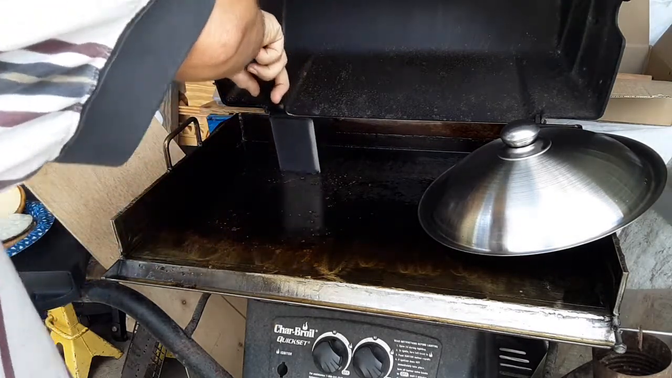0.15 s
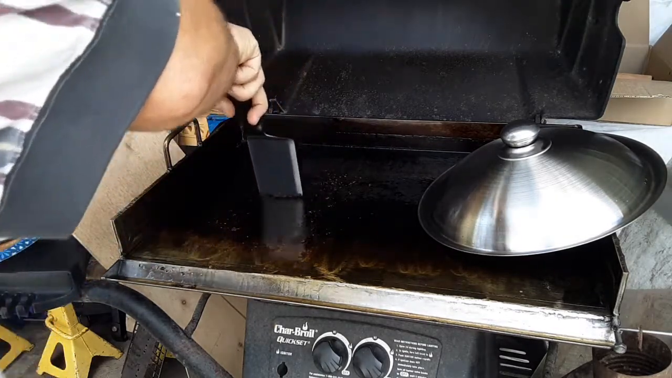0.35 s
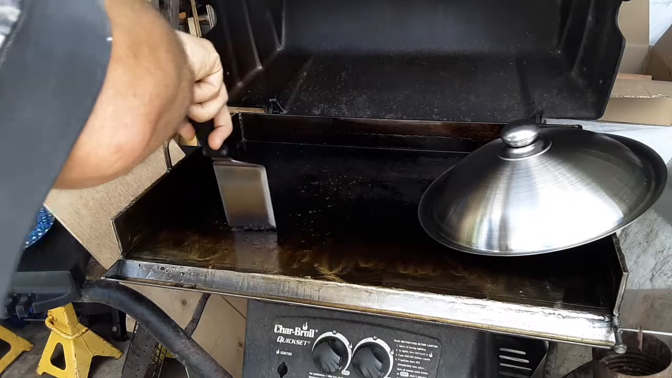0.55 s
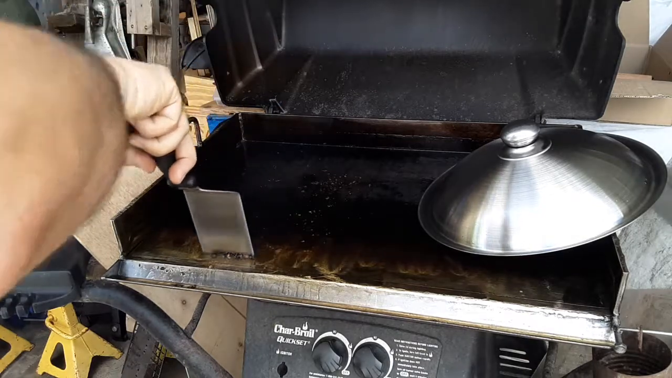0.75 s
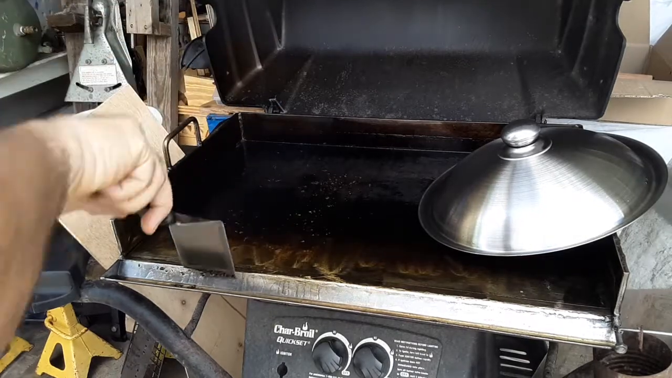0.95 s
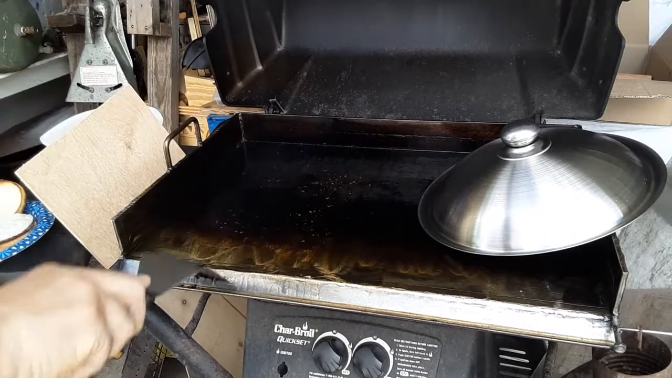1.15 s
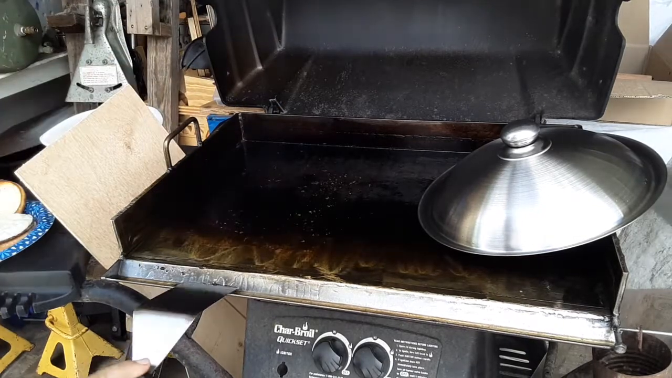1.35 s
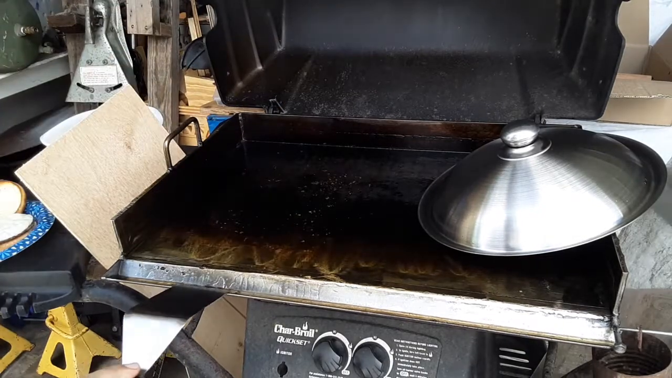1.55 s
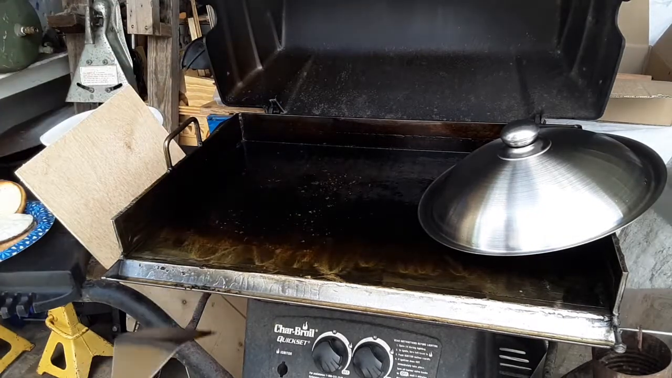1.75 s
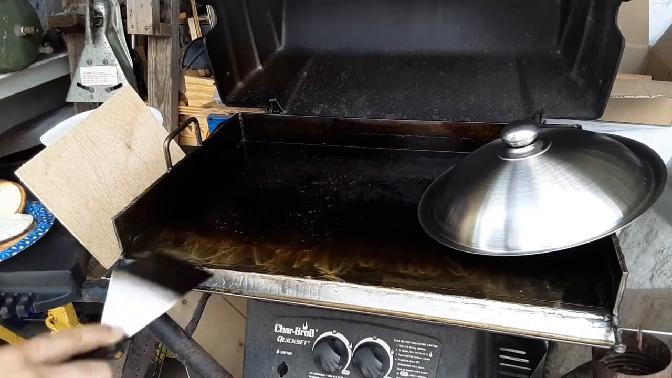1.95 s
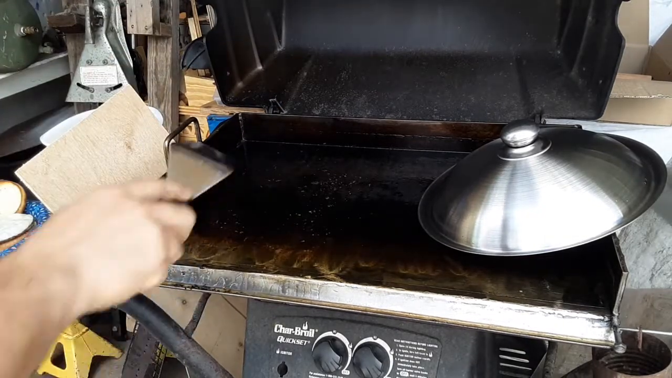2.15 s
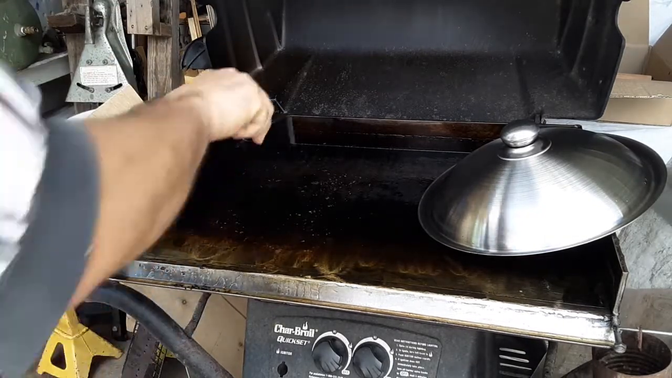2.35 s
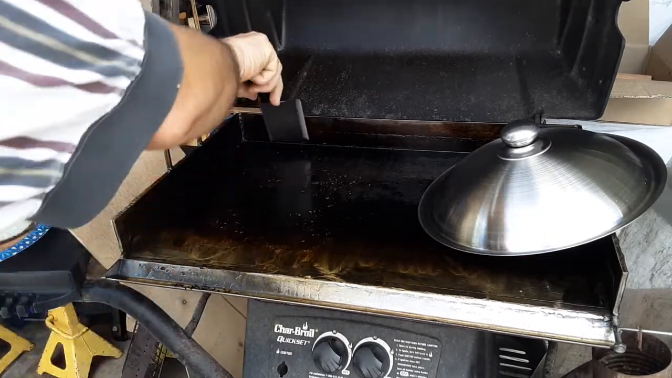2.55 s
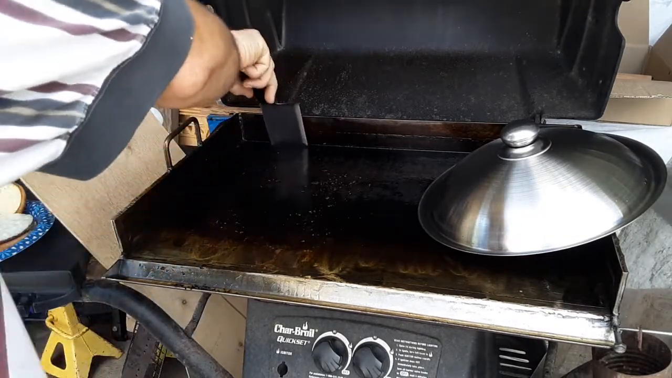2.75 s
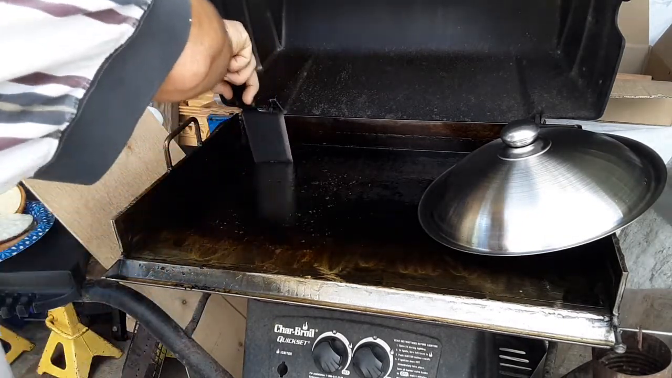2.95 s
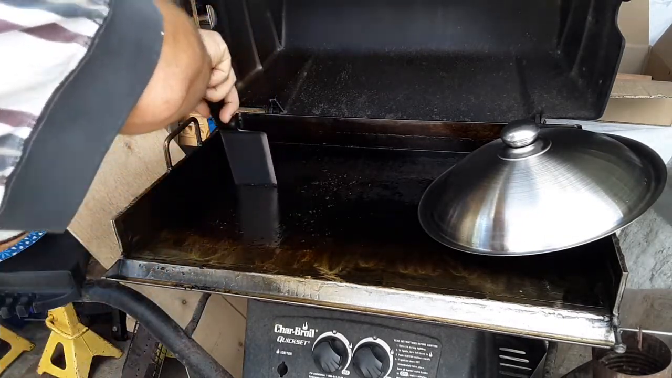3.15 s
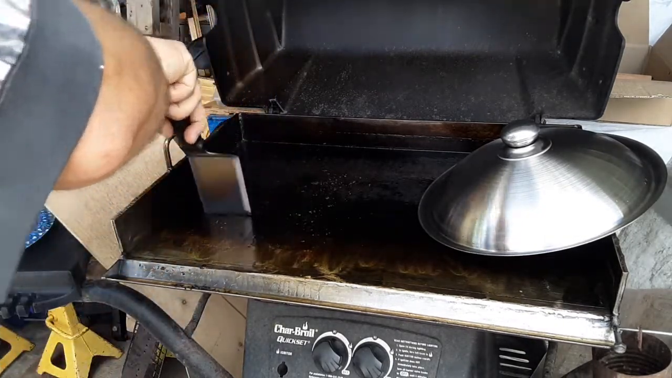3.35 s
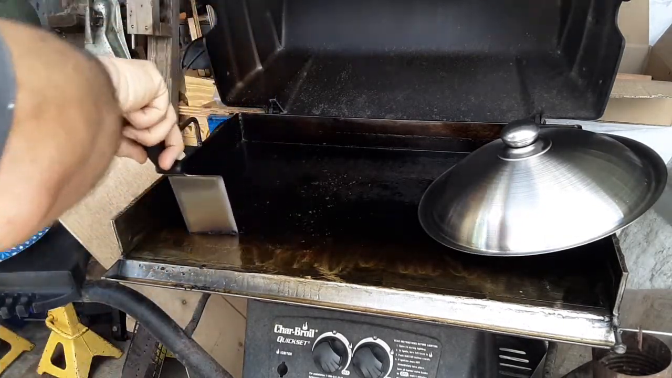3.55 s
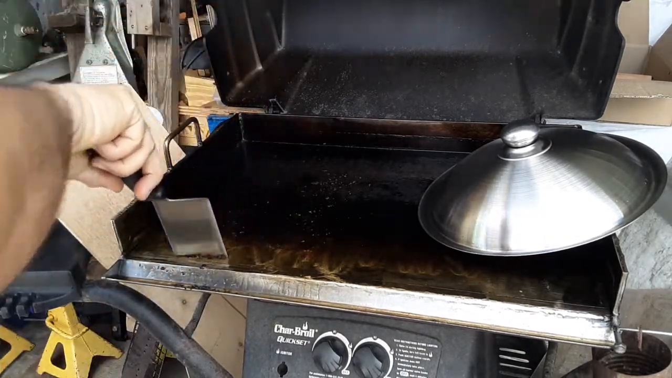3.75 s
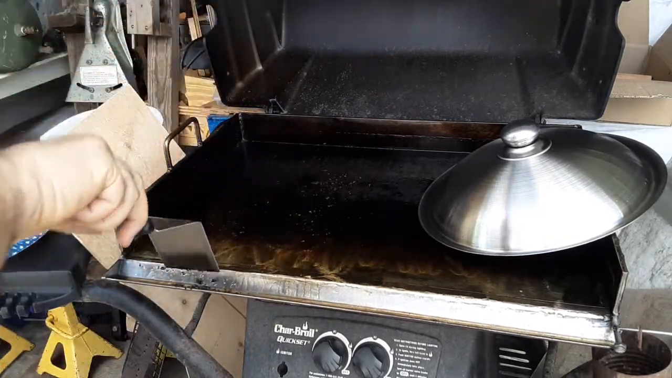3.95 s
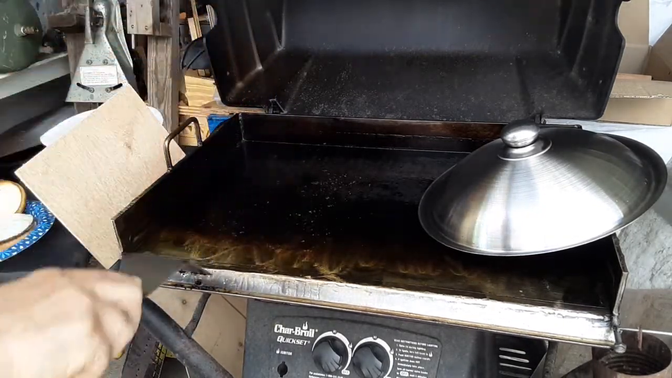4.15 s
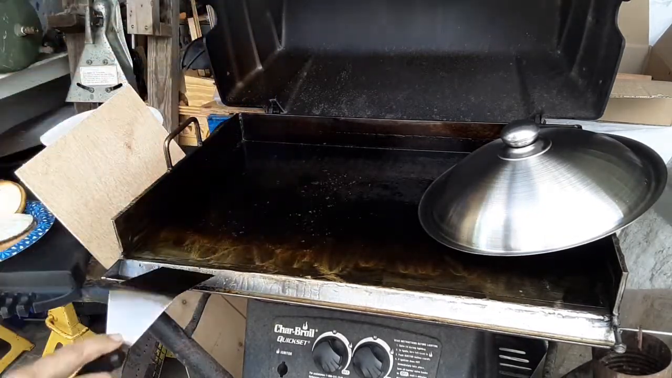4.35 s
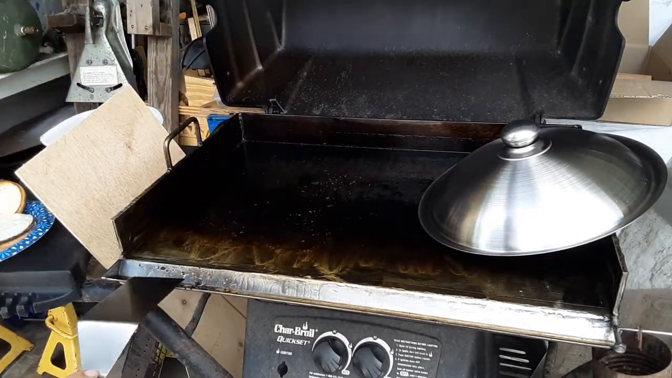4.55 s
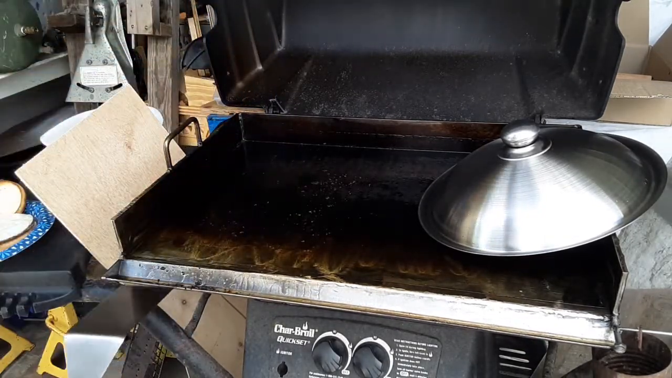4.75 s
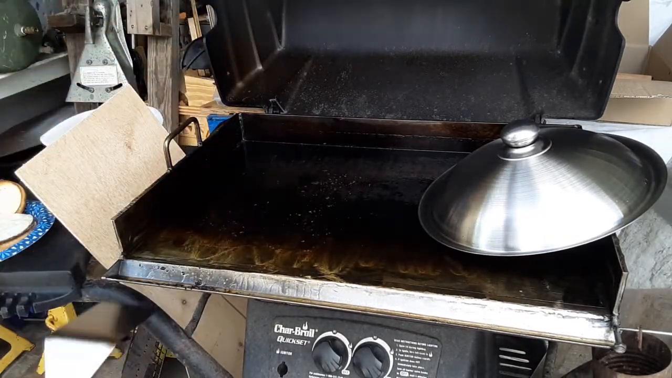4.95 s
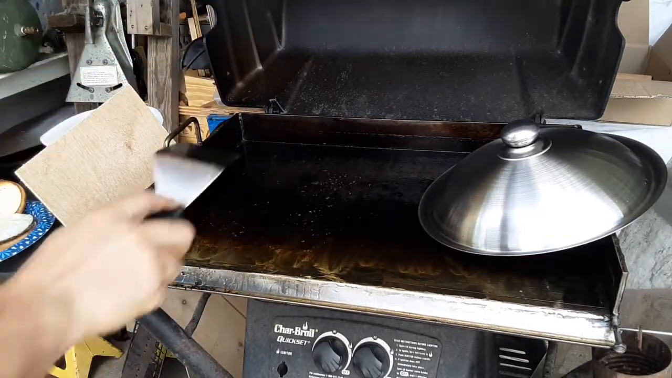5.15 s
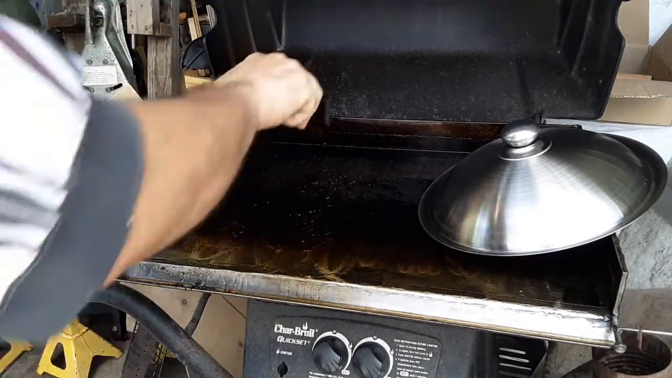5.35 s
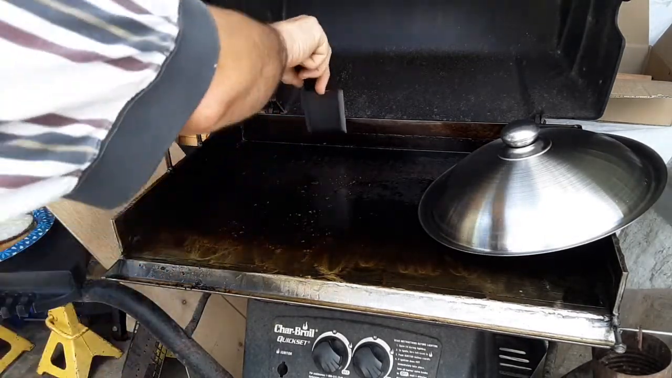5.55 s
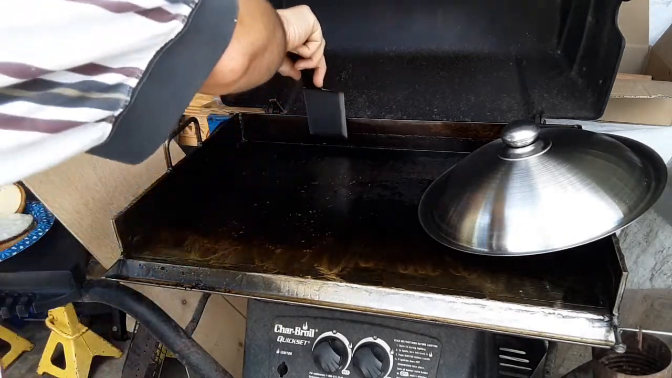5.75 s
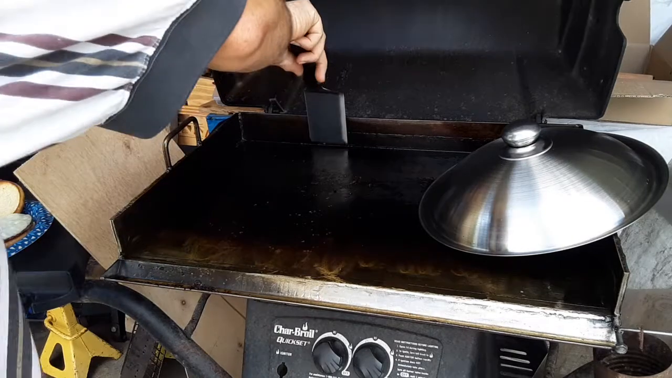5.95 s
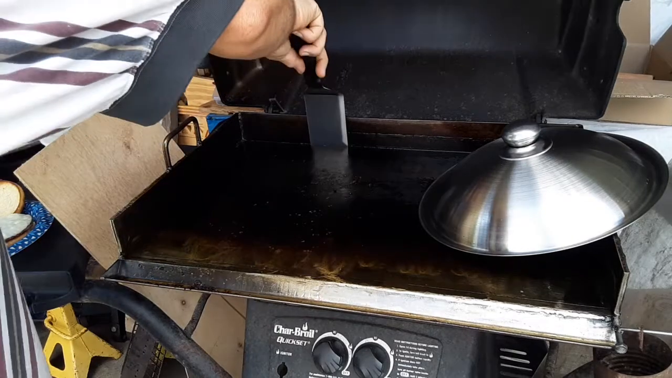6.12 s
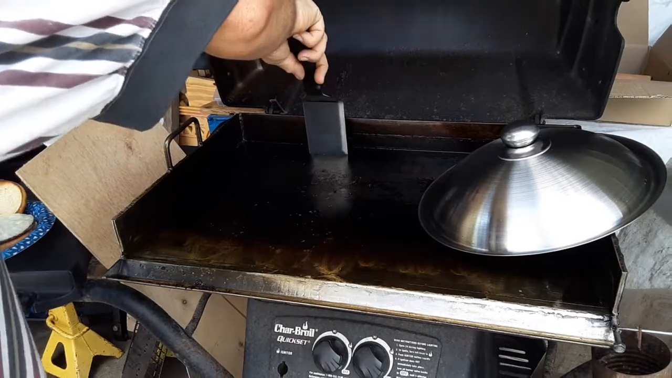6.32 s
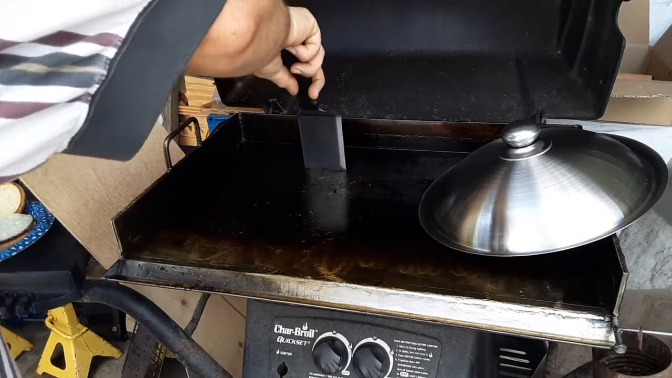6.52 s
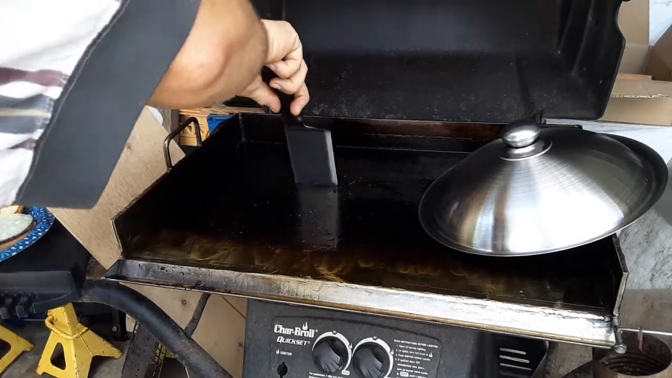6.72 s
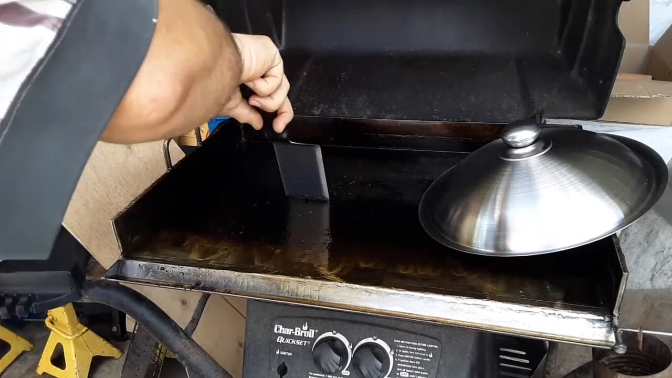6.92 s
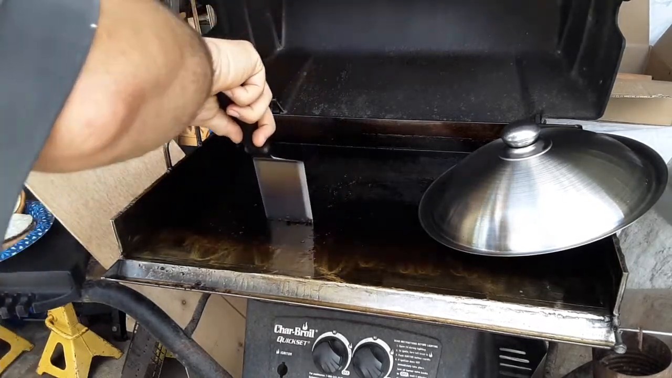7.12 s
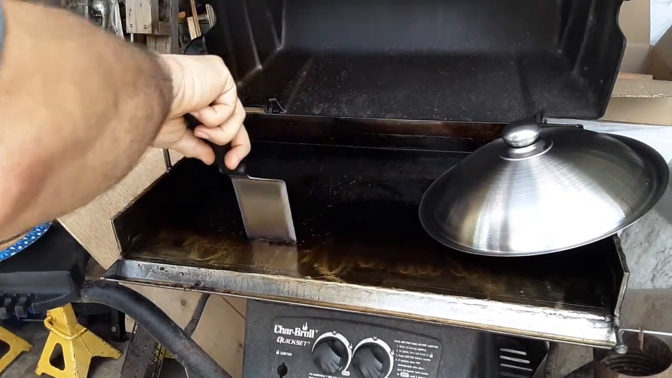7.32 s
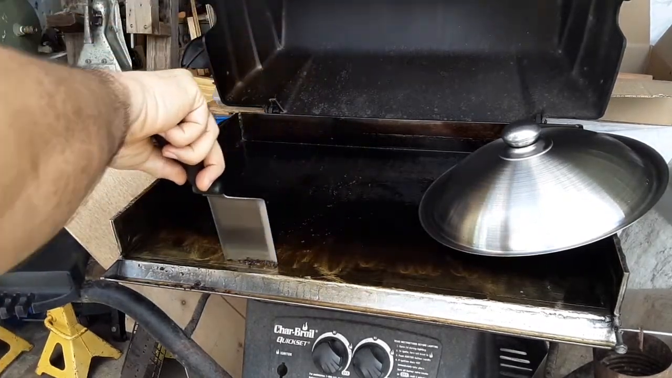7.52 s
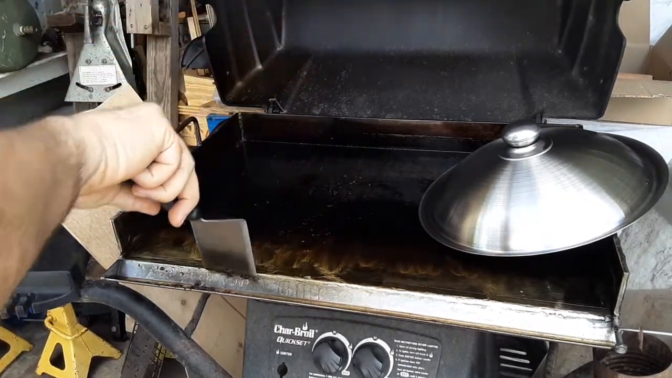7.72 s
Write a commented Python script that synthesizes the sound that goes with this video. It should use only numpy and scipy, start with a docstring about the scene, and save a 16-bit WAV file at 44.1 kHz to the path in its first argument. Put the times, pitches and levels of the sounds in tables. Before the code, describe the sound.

Close stereo, outdoors, dry. A steel scraper is already rasping on a thick griddle at 0 s; a hard plate knock with a bright blade ring lands at 0.1, then the scrape thins until about 0.9. Gutter knocks follow at 0.9 and, sharper, 1.33, with rail clanks around 1.2. A light scuff and ringing release come near 1.7, among soft dull bumps until 2.1. After a quiet gap, two plate knocks at 2.74 and 2.93 open a strong, jerky rasp with catches, surging near 3.35 and fading by 3.9 with a faint blade ring. A loud double rail clank hits at 4.6, then a small ringing release at 4.8. A heavy plate knock at 6.0 leads to a gritty, pulsing scrape, strongest 6.3-6.7, thinning into fine hiss and tiny ticks by 7.7. Faint insects, air, rumble and low hum persist; a rapid ticking insect stops near 5.

```python
"""A harsh steel scrape comes first: a flat scraper dragged over a thick griddle plate outdoors.
Its edge slips over baked crust (clumped noise) and drives the resonances of plate and blade.
Between strokes the blade knocks plate, grease gutter and front rail, and rings as it leaves them
(decaying modes plus dense clatter). Behind it: insect chorus, a ticking insect that falls silent, airy hiss,
rumble with a low hum (shaped noise, gated noise, a wavering sine) and dull bumps (short sine pulses)."""
import sys
import numpy as np
from scipy import signal
from scipy.fft import rfft, irfft, next_fast_len
from scipy.io import wavfile
from scipy.ndimage import uniform_filter1d, map_coordinates

SR = 44100
rng = np.random.default_rng(int(sys.argv[2]) if len(sys.argv) > 2 else 0)


def store_wav(level_fs):
    """Save 16-bit WAV to argv[1]."""
    pcm = np.round(np.clip(np.atleast_2d(level_fs), -1, 1) * 32767)
    wavfile.write(sys.argv[1], SR, pcm.T.astype(np.int16))


def voltage_ratio(level):
    """Linear amplitude factor for a level in decibels (scalar or array-like)."""
    return 10 ** (np.asarray(level, float) / 20)


N = 343228

# background colours: f/Hz, relative density/dB
RUMBLE_COLOUR = [(13, -59), (22, -41.5), (39, -8), (59, -3.5), (124, -3.5), (189, -8.5), (222, -7.5),
                 (386, -19), (688, -14.5), (827, -18), (929, -19), (1340, -26.5), (1940, -16), (2450, -26),
                 (5500, -31), (7150, -61.5), (12100, -120)]
AIR_COLOUR = [(1760, -49.5), (3000, -17), (4320, -0.5), (5750, -26.5), (6670, 1.5), (8050, -5.5),
              (9200, -4.5), (16000, -12.5)]
CHORUS_COLOUR = [(3240, -24), (5500, -18.5), (5880, -19), (6310, -8), (7080, -7), (7540, -13),
                 (8000, -22.5), (10400, -57), (17600, -120)]
# rumble level, airy hiss level, ticking insect level: t/s, level/dB
RUMBLE_LEVEL = [(0, -54), (2, -51), (2.7, -56), (5.8, -55), (6.8, -51), (7.78, -49.5)]
AIR_LEVEL = [(0, -53), (2, -63.5), (2.7, -54), (3.9, -64), (4.15, -56), (4.5, -62.5), (5.4, -73),
             (5.8, -63), (7.78, -56)]
TICK_LEVEL = [(0, -57), (1, -58.5), (2.35, -61), (2.7, -55), (3.7, -67), (3.9, -57), (4.15, -60),
              (4.5, -68), (5, -99), (7.78, -95)]
# mean tick rate: t/s, rate/(1/s)
TICK_RATE = [(0, 58), (3.8, 53), (4.1, 29), (4.5, 21), (7.78, 37)]
CHORUS_DB = -57
# left-right likeness, near and far sources: f/Hz, likeness/(0-1)
ALIKE_NEAR = [(200, 1), (500, 0.89), (1000, 0.62), (3000, 0.12), (8000, 0), (14000, 0)]
ALIKE_FAR = [(30, 0.53), (80, 0.93), (200, 0.78), (2000, 0.1), (8000, 0.027)]

# dull bumps: t/s, level before left and right gains/dB, f/Hz
BUMPS = [(1.585, -37, 100), (1.605, -36, 120), (1.635, -38, 110), (1.675, -35, 120), (1.701, -28.5, 106),
         (1.785, -37, 138), (1.9, -41, 119), (1.97, -34.5, 100), (2.085, -43, 90), (7.604, -40, 226),
         (7.64, -41, 222)]

# modes of plate, gutter, rail, free blade and cabinet: f/Hz, level/dB, t60/s
PLATE_MODES = [(212, -30, 0.34), (284.5, -23, 0.58), (593, -14.5, 0.2), (740, -20, 0.46), (918, -18, 0.29),
               (1095, -10.5, 0.5), (1310, 0, 0.081), (1665, -2.5, 0.25), (1860, 10, 0.089),
               (1960, -1.5, 0.29), (2190, -1, 0.22), (2560, -1, 0.165), (2692, -11, 0.16),
               (3135, -11.5, 0.17), (2980, -7, 0.29), (3300, -12.5, 0.27), (3700, -35, 0.13),
               (3725, -28.5, 0.156), (4290, -36.5, 0.48), (4600, -38.5, 0.2), (5443, -35, 0.16)]
GUTTER_MODES = [(233, -13.5, 0.45), (291, -9.5, 0.58), (655, -5.5, 0.37), (930, -5, 0.052), (880, -22, 0.1),
                (1060, -5, 0.48), (1355, 4.5, 0.18), (1480, -16, 0.46), (1630, 12.5, 0.048),
                (1850, -11, 0.64), (1910, 6.5, 0.22), (994, 2, .12), (2000, 5, 0.18), (2140, -1, 0.26),
                (2240, 3.5, 0.22), (2580, -26, 0.31), (2770, -26, .2), (2764, -4, 0.29), (2990, 2.5, 0.17),
                (3260, -6, 0.28), (4870, -26, 0.29), (5276, -31, .2), (5755, -26.5, 0.28), (6480, 6, 0.09)]
RAIL_MODES = [(212, -3.5, 0.45), (326, -10.5, 0.47), (756, -16.5, 0.43), (1009, 2.5, 0.39),
              (1427, -14, 0.38), (1724, 0.5, 0.37), (1710, -5.5, 0.13), (2060, 5.5, 0.16), (3290, -1, 0.26),
              (1742, -11.5, 0.95), (2280, -16, 0.19), (2288, -28, 0.51), (2650, 11, 0.13), (3110, -31, 1),
              (2900, -24, 0.12), (3110, 2.5, 0.23), (3550, -2, 0.25), (4700, -8, 0.1), (4880, 0, 0.21),
              (5620, 6.5, 0.07), (5650, -9, 0.28), (6000, 9, 0.073), (6970, -15, 0.12), (6810, 3, 0.17),
              (7340, -28, 0.17), (7850, -26, 0.29), (7700, -24, 0.13), (11130, -6.5, 0.16)]
BLADE_MODES = [(2751, -10, .1), (3074, -9, .14), (3725, -18, .15), (4100, -14, .06), (5572, -18, .15),
               (6869, 0, .36), (8624, -13, .2), (9798, -20, .15), (10890, -18, .14), (11500, -16, .06),
               (13500, -10, .07)]
CABINET_MODES = [(540, -36, 0.34), (675, 1, 0.68), (690, -12, 2.9), (701.4, 1.5, 1.26), (734, -5.5, 1.45),
                 (800, -1, 0.61), (970, 2.5, 0.45), (1113, -17.5, 0.95)]
# blows and blade releases (1.713, 3.889, 4.801 s) on plate, gutter, rail:
# t/s, nominal peak/dB, free blade re part/dB, hardness/(dB/octave), cabinet re part/dB
PLATE_EVENTS = [(0.104, -9, -5, 1.5, -14), (2.739, -16, -30.5, -7.5, -21), (2.934, -15, -19, -4, -37),
                (5.901, -23.5, -29, -6, -22), (6.016, -4.5, -39, -3.5, -40)]
GUTTER_EVENTS = [(0.837, -37, -20, -6.5, -20), (0.922, -15, -28, -4.5, -19.5), (1.33, -5.5, -21, -0.4, -30),
                 (1.713, -26, -3, -4.5, -1.5), (3.889, -37.5, 16.5, 9, 6.5), (7.561, -39, -11, 18, -30),
                 (7.719, -39, -17, 13, -30)]
RAIL_EVENTS = [(1.208, -25.5, -20, -0.063, -2), (1.24, -11.5, -12, -0.88, -5), (4.595, -3, -28, 1, -34.5),
               (4.624, -8.5, -30, 0.1, -21), (4.783, -25, -11, .5, -25), (4.801, -19.5, 5, -0.77, -15)]
# clatter of dense modes re ring of plate, gutter, rail: level/dB
CLATTER_DB = [-8, -5.5, -7]
# decay of dense modes: f/Hz, t60/s
CLATTER_T60 = [(200, 0.65), (1000, 0.44), (2000, 0.44), (4000, .2), (8000, 0.13), (14000, 0.098)]
# colour of dense modes: f/Hz, relative density/dB
CLATTER_COLOUR = [(100, -58), (220, -5.5), (400, -15.5), (900, -6.5), (2000, 0.5), (3000, -3), (6500, -1),
                  (8000, -11), (11000, -9.5), (16000, -20)]

# strokes, one list each: t/s, pressure as rasp level/dB, blade steepness as hiss re rasp/dB
STROKES = [
    [(0.0, -15.5, -6.5), (0.04, -22, -2.5), (0.094, -30.5, -6), (0.106, -31, -4), (0.144, -35, -7.5),
     (0.254, -41, -2.5), (0.352, -40.5, -1), (0.364, -42.5, 2), (0.5, -39, -4), (0.536, -43.5, -3),
     (0.85, -59, 5.5), (0.88, -81, -1)],
    [(1.44, -53, -9), (1.46, -55, -5), (1.6, -48, 1), (1.67, -52.5, -2), (1.72, -38, -2.5),
     (1.748, -58, -15), (1.86, -68, -13)],
    [(2.742, -31.5, 6.5), (2.778, -29, -19.5), (2.832, -23, 0), (2.862, -16, -5.5), (2.882, -13.5, -11),
     (2.902, -28.5, -0.5), (3.076, -35.5, -1), (3.098, -24, -15), (3.106, -32.5, 0), (3.124, -27.5, -4.5),
     (3.25, -42, 4.5), (3.292, -25, 6), (3.348, -19.5, -3), (3.482, -43, -7), (3.518, -44, 0),
     (3.854, -57.5, 1.5), (3.92, -61.5, 1)],
    [(4.73, -45.5, -6), (4.812, -38.5, 0), (4.862, -58, -16), (4.87, -43, 3)],
    [(5.87, -48.5, -2), (5.892, -58, -2), (5.902, -34, -9), (5.92, -45.5, 1.5), (6.005, -39, 4)],
    [(6.19, -51, -19), (6.206, -43, -4), (6.234, -33.5, -1.5), (6.312, -26.5, 0), (6.324, -23.5, -6.5),
     (6.402, -22.5, -4), (6.468, -29, 2), (6.518, -24.5, -3), (6.586, -38.5, 0), (6.722, -29, -2.5),
     (6.85, -49, -5), (6.956, -45, 1.5), (6.982, -33.5, -8), (6.996, -38.5, -2), (7.034, -31.5, 1),
     (7.152, -34, -4.5), (7.19, -47.5, -2), (7.238, -44.5, 3), (7.35, -49, -2), (7.408, -52, 8.5)],
    [(7.409, -49, 9), (7.447, -48, 11.5), (7.533, -58.5, 14.5), (7.569, -52.5, 10.5), (7.629, -61.5, 4),
     (7.725, -70.5, 19.5), (7.78, -88, 8)],
]
# dry, fine crust under each stroke, added to the finest hiss: level/dB
DRY_DB = [1.5, -3, 1, -2.5, -6.5, 0, -3]
# edges of the four parts (drone, rasp, lower hiss, finest hiss): f/Hz
PART_EDGES_HZ = [150, 900, 3500, 7500, 16500]
# spot of the plate under the edge: t/s, spot/(0-3)
SPOT = [(0, 0), (.3, 0), (.6, 2), (1.8, 2), (2.7, 0), (3.2, 0), (3.27, 1), (3.6, 1), (3.9, 2), (6.8, 2),
        (6.95, 3), (7.78, 3)]
# modes driven by the pressed edge: f/Hz, width/Hz, level re rasp colour at spots 0, 1, 2, 3/dB
PRESSED_MODES = [(224.76, 1.34, 21, 4, 2.8, 12), (282.4, 13.7, 14, 14, 14.7, 12.2),
                 (424.6, 16, 23, 28.5, 19.2, 22), (556.4, 10.8, -2.5, -9, 23.2, 9.8),
                 (633, 3.5, -3, 26.5, 4.3, 23), (712, 26, 13.5, 20, 18.7, 20.3),
                 (796, 8.2, -24, 18, 8.1, 4.9), (974, 12, 1.5, -9, 2, 4), (1028, 5.7, -9, -9, 23, 8.9),
                 (1102, 14.5, 23, 33, 8, 23), (1216, 10, 13, 22, 1.3, 6), (1334, 13, 12.5, 1, 19.4, 19),
                 (1550, 4.1, -19, 18.5, 8, 4), (1588.5, 12.7, 19, 12, 22, 5.6),
                 (1622, 18, -17.5, 19, 4.2, 5.5), (1801, 16.4, 18.5, 14.5, 16, 3.4),
                 (1909, 37, 12.5, 5, 5.7, 8.3), (1981, 34, 19, 16, 14, 4.3), (2066, 10, 17.5, 8, 7.8, 1.9),
                 (2213, 22, 17, -10, 2.2, 2.2), (2303, 14, 10, 9, 8, 19), (2478, 25, 11.5, 14, 9.5, 13.5),
                 (2506, 5.9, 11, -1, 22, 8.5), (2760, 14, 24.5, 5, 16, 6), (2937, 76, -13, 12, 14, 4.8),
                 (3140, 20, -13, 11, 1.6667, 5.8), (3130, 16, 14, -11, 19, 1.6),
                 (4090, 6.7, 9, -2, 1.5, 0.67), (5650, 15, 8, 1, 3.4, 3.9), (6800, 65, -3.5, 7, 0.67, 5.3),
                 (6937, 30, 12.5, 7.5, 15.3, 3.7), (8440, 120, 15, 12.5, 13.6, 9.3),
                 (10660, 28, -6.5, 21, 1.6667, 3.3), (11030, 58, 13, 13, 16.3, 14.4),
                 (13760, 31, 16.5, 13.5, 15, 14)]
# broad rasp between those modes: f/Hz, relative density/dB
RASP_COLOUR = [(71, -62), (120, -8.5), (222, -4), (341, -15), (436, -19), (949, -18), (1070, -22),
               (1940, -2.5), (2640, -17.5), (6770, -9), (7500, -20.5), (11100, -11), (16000, -10.5)]
# edge catches on a lump of crust: t/s, burst (negative = dip)/dB
CATCHES = [(2.823, 8.5), (2.842, -3), (2.871, 0), (2.877, -4), (2.97, 5), (3.093, -3), (3.334, 5),
           (6.398, 1), (6.688, 5), (7.03, 4), (7.41, -8), (7.425, 9.5)]
# drone by place on the plate: t/s, level/dB
DRONE_PLACE = [(0, 0.5), (.9, 3), (1.8, -2.5), (2.75, 10), (2.87, -11), (2.98, -3.5), (3.12, 8), (3.4, 2),
               (3.9, -1), (4.8, -2.5), (5.95, -4), (6.2, -3), (6.45, -1), (6.6, 4.5), (6.8, 4), (7.2, -1.5),
               (7.78, -1)]
# drone level at a rasp of -35 dB; dB of drone per dB of rasp; span of the pressure average
DRONE_DB, DRONE_DB_PER_DB, DRONE_SPAN_S = -42.5, 0.53, 0.043
# lower hiss, finest hiss re rasp; dB of finest hiss per dB of steepness
EDGE_DB, FINE_DB, FINE_DB_PER_DB = -1.5, -5.5, 1.03


def unit(x):
    """Scales to rms 1."""
    return x / np.sqrt(np.mean(x ** 2) + 1e-20)


def along(points, hz):
    """Reads (Hz, value) points on a log frequency axis."""
    f, v = np.transpose(points)
    return np.interp(np.log(hz + 1), np.log(f + 1), v)


def curves(rows):
    """One value per sample for each column after the time."""
    s, *cols = np.transpose(rows)
    return [np.interp(np.arange(N) / SR, s, c) for c in cols]


def wobble(rate_hz):
    """Smooth random curve with rate_hz knots a second."""
    knots = rng.standard_normal(int(N * rate_hz / SR) + 4)
    return map_coordinates(knots, [np.arange(N) * rate_hz / SR])


def filtered(x, response):
    """Applies a complex response of frequency."""
    n = x.shape[-1]
    m = next_fast_len(n + SR // 4)
    return irfft(rfft(x, m) * response(np.fft.rfftfreq(m, 1 / SR)), m)[..., :n]


def stereo(pair, alike):
    """Uses two unrelated versions as mid and side, weighted for the given left-right likeness."""
    def weights(hz):
        turn = np.arccos(np.clip(along(alike, hz), -1, 1)) / 2
        return np.array([np.cos(turn), np.sin(turn)])

    mid, side = filtered(pair, weights)
    return np.array([mid + side, mid - side])


def rush(colour):
    """Two noises of rms 1 in this colour."""
    noise = rng.standard_normal((2, N))
    return unit(filtered(noise, lambda hz: voltage_ratio(along(colour, hz))))


def low_hum(rumble_db):
    """Sine near 60 Hz, wavering in pitch and level, tied to the rumble level."""
    level = voltage_ratio(rumble_db - 6.0 + 0.83 * wobble(2.7))
    cycles = np.cumsum(60 + 0.95 * wobble(25)) / SR
    return level * np.sin(2 * np.pi * cycles) * [[1], [.4]]  # mid, side


def ticking_insect():
    """High noise gated by a periodic pulse: one burst a turn, at an unsteady rate."""
    tick_db, = curves(TICK_LEVEL)
    turn = np.cumsum(curves(TICK_RATE)[0] * (1 + 0.18 * wobble(25))) / SR
    gate = unit(np.exp(0.83 * np.cos(2 * np.pi * turn)))
    wings = rush([(7000, -46), (8600, -6.0), (9500, -6.0), (10400, -10.5), (13000, -28.0), (16000, -42)])
    return voltage_ratio(tick_db) * gate * wings


def outdoors():
    """Lumpy rumble, low hum, smooth air and insect chorus as shaped noise and a sine, plus the ticking."""
    (rumble_db,), (air_db,) = curves(RUMBLE_LEVEL), curves(AIR_LEVEL)
    rumble = voltage_ratio(rumble_db + 1.5 * wobble(3.52) + 1.6 * wobble(23)) * rush(RUMBLE_COLOUR)
    air = voltage_ratio(air_db + 0.27 * wobble(1.7)) * rush(AIR_COLOUR)
    chorus = voltage_ratio(CHORUS_DB + 2.4 * wobble(3.4)) * rush(CHORUS_COLOUR)
    return stereo(low_hum(rumble_db) + rumble + air + chorus + ticking_insect(), ALIKE_FAR)


def bumps():
    """Dull pushes: a low sine under a short bell-shaped envelope, with no ring."""
    out, t = np.zeros(N + SR), np.arange(SR // 8) / SR
    envelope = np.exp(-((t - .016) / 0.0078) ** 2)
    for s, db, hz in BUMPS:
        out[round(s * SR):][:len(t)] += voltage_ratio(db) * envelope * np.sin(2 * np.pi * hz * t)
    return out[:N] * voltage_ratio([[3.5], [-12]])  # left, right


def ringing(modes, t, hard_db):
    """Two versions of one event's ring; each mode is a close pair that beats, at fresh strength and phase."""
    hz, db, t60 = np.repeat(np.transpose(modes), 2, axis=1)[:, :, None]
    hz = hz + 1.8 / t60 * rng.standard_normal(hz.shape)  # short-lived modes split wider
    db = db - 8 * (np.arange(len(hz)) % 2)[:, None]  # second of each pair is weaker
    spread_db = rng.normal(0, 1.5, (2, len(hz), 1))
    level = voltage_ratio(db + hard_db * np.log2(hz / 2000) + spread_db - 60 * t / t60)
    cycles = hz * t + 0.6 * rng.random((2, len(hz), 1))
    ring = np.sum(level * np.sin(2 * np.pi * cycles), axis=1)
    return ring / np.std(ring[:, :SR // 50])


def clatter(t, hard_db, haste=1):
    """Noise whose every band dies at its own speed, haste times faster: dense modes of thick steel."""
    hz, s, z = signal.stft(rng.standard_normal((2, len(t))), SR, nperseg=256)
    colour = voltage_ratio(along(CLATTER_COLOUR, hz) + hard_db * np.log2((hz + 50) / 2000))[:, None]
    decay = voltage_ratio(-60 * haste * s / along(CLATTER_T60, hz)[:, None])
    wash = signal.istft(z * colour * decay, SR, nperseg=256)[1][:, :len(t)]
    return wash / np.std(wash[:, :SR // 50])


def blows_and_releases():
    """Blows ring part, blade, cabinet and dense modes; on release the freed blade rings as it leaves the metal."""
    out, t = np.zeros((2, N + SR)), np.arange(SR) / SR
    envelope = (1 - np.exp(-t / 0.000144)) * np.clip((1 - t) / 0.22, 0, 1)  # onset, end fade
    onset_boost = 1 + 0.3 * np.exp(-t / 0.00286)
    groups = zip((PLATE_EVENTS, GUTTER_EVENTS, RAIL_EVENTS), (PLATE_MODES, GUTTER_MODES, RAIL_MODES), CLATTER_DB)
    for events, modes, clatter_db in groups:
        for s, db, blade_db, hard_db, cabinet_db in events:
            wash = voltage_ratio(clatter_db) * onset_boost * clatter(t, hard_db)
            part = ringing(modes, t, hard_db)
            blade = voltage_ratio(blade_db) * ringing(BLADE_MODES, t, 0) * [[1], [.4]]  # mid, side
            cabinet = voltage_ratio(cabinet_db) * ringing(CABINET_MODES, t, 0)
            sound = stereo(envelope * (part + blade + cabinet + wash), ALIKE_NEAR) * envelope
            # rms of the first 20 ms sits 11.5 dB under the nominal peak
            out[:, round(s * SR):][:, :SR] += voltage_ratio(db - 11.5) * sound / np.std(sound[:, :SR // 50])
    return out[:, :N]


def slipping():
    """Dense slips of uneven size, in clumps, with wandering spectral patches."""
    size_db = 2.73 * np.minimum(rng.exponential(size=N), 4) * (rng.random(N) < .08)
    sizes = voltage_ratio(size_db + 1.56 * wobble(150) + 0.74 * wobble(40))
    z = signal.stft(sizes * rng.standard_normal((2, N)), nperseg=256)[2]
    patches = uniform_filter1d(rng.standard_normal(z.shape[1:]), 4, 0)  # over frequency
    patches = uniform_filter1d(patches, 12, 1)  # over time
    return unit(signal.istft(z * voltage_ratio(2.12 * unit(patches)), nperseg=256)[1][:, :N])


def catching():
    """Gain of the catches on crust: each jumps by its dB and dies within milliseconds."""
    s, db = np.transpose(CATCHES)[:, :, None]
    after = np.arange(N) / SR - s
    return voltage_ratio(np.sum(db * (after > 0) * np.exp(-np.abs(after) / 0.0026), axis=0))


def stroke_levels():
    """Pressure and blade steepness set drone, rasp, lower and finest hiss (dB); silent off the plate."""
    time = np.arange(N) / SR
    parts_db = np.full((4, N), -120.)
    place_db, = curves(DRONE_PLACE)
    for rows, dry_db in zip(STROKES, DRY_DB):
        rasp_db, steep_db = curves(rows)
        mean_power = uniform_filter1d(voltage_ratio(2 * rasp_db), size=int(DRONE_SPAN_S * SR))
        slow_db = 10 * np.log10(np.abs(mean_power) + 1e-12)
        drone_db = DRONE_DB + place_db + DRONE_DB_PER_DB * (slow_db + 35)
        edge_db = rasp_db + EDGE_DB + steep_db
        fine_db = rasp_db + FINE_DB + dry_db + FINE_DB_PER_DB * steep_db
        touch = (time >= rows[0][0]) & (time <= rows[-1][0])
        parts_db[:, touch] = np.array([drone_db, rasp_db, edge_db, fine_db])[:, touch]
    return parts_db


def band_pass(x, lo, hi):
    """Keeps lo to hi Hz with fourth-order slopes."""
    return filtered(x, lambda f: 1 / np.sqrt((1 + (lo / (f + 1)) ** 8) * (1 + (f / hi) ** 8)))


def plate_response(spot, m):
    """Pressed modes over a broad rasp, plus the dense modes this spot drives, on m-point FFT bins."""
    f = np.fft.rfftfreq(m, 1 / SR)
    tail = clatter(np.arange(SR // 4) / SR, 0, haste=2.96)[0]
    dense = rfft(tail / np.linalg.norm(tail), m)
    ring, g = 0, f + 1  # keeps clear of 0 Hz
    for k, (hz, width, *db) in enumerate(PRESSED_MODES):
        ring = ring + (-1) ** k * voltage_ratio(db[spot]) * 1j * g * width / (hz * hz - g * g + 1j * g * width)
    return (ring + 1.125) * voltage_ratio(along(RASP_COLOUR, f)) + 0.23 * dense


def scrape():
    """The slipping edge drives the modes of plate and pressed blade, which vary from spot to spot."""
    slips, bursts, parts_db = slipping(), catching(), stroke_levels()
    bands = [band_pass(slips, lo, hi) for lo, hi in zip(PART_EDGES_HZ, PART_EDGES_HZ[1:])]
    m = next_fast_len(N + SR // 4)
    spectra = [rfft(band[0], m) for band in bands]
    place, = curves(SPOT)
    out = np.zeros((2, N))
    for spot in range(4):
        response = plate_response(spot, m)
        here = np.sqrt(np.clip(1 - np.abs(place - spot), 0, 1))  # edge glides between spots
        force = np.zeros((2, N))
        for db, band, spectrum in zip(parts_db, bands, spectra):
            rms_after_plate = np.linalg.norm(spectrum * response) * np.sqrt(2 / m / N)
            force += voltage_ratio(db) * band / rms_after_plate
        out += filtered(here * bursts * force, lambda f: response)
    return stereo(out, ALIKE_NEAR)


def scene():
    """Sums all layers; low and middle tones of the griddle reach the left microphone first."""
    delay_s = np.array([[0], [.00007]])  # left, right; shrinks above 3 kHz
    lag = lambda f: np.exp(-2j * np.pi * f / (1 + (f / 3000) ** 2) * delay_s)
    return filtered(scrape() + blows_and_releases(), lag) + bumps() + outdoors()


def band_limit(x):
    """A steep low-pass at the top of the band."""
    return signal.sosfilt(signal.butter(12, 16530, fs=SR, output="sos"), x)


def record(dry):
    """The microphone pair loses the deepest bass, rolled off below 42 Hz."""
    mix = filtered(dry, lambda f: 1 / np.sqrt(1 + (42 / (f + 1)) ** 4))
    return band_limit(mix)


dry = scene()
out = record(dry)
store_wav(out)
```